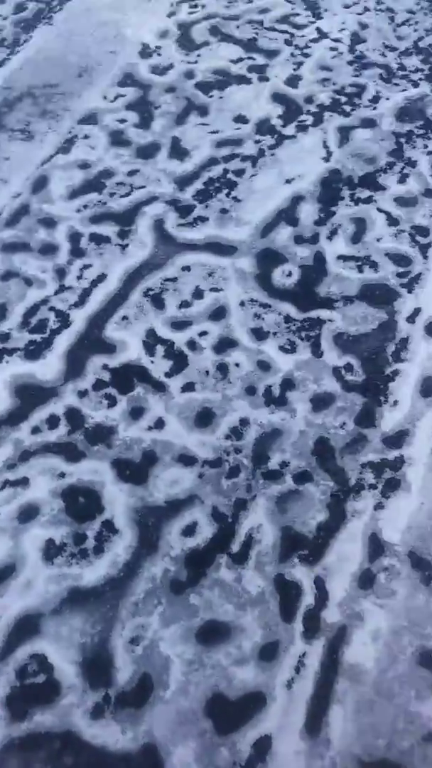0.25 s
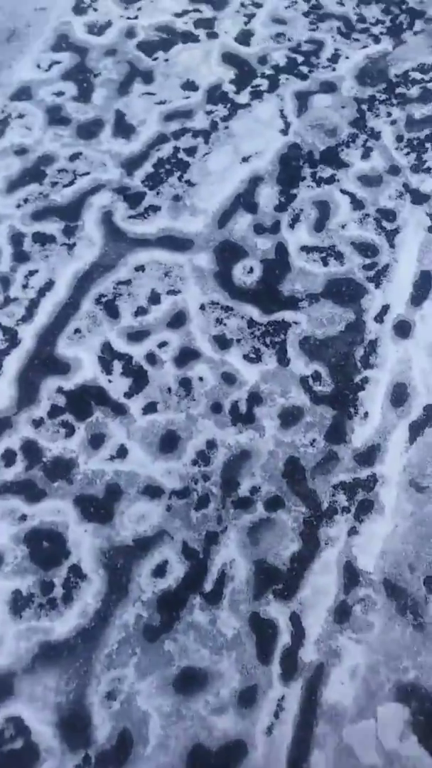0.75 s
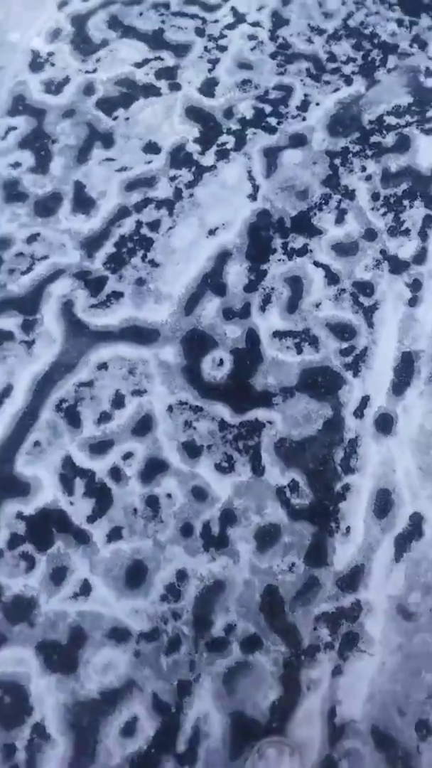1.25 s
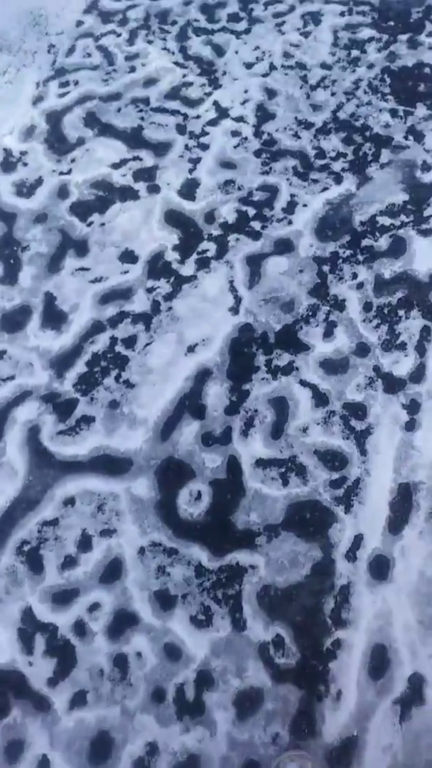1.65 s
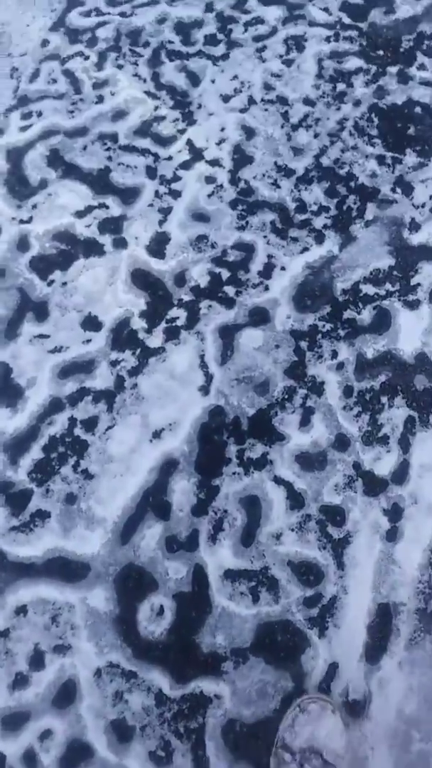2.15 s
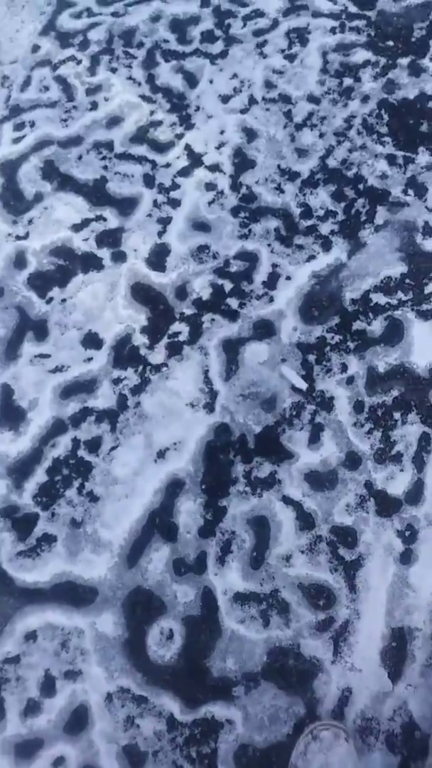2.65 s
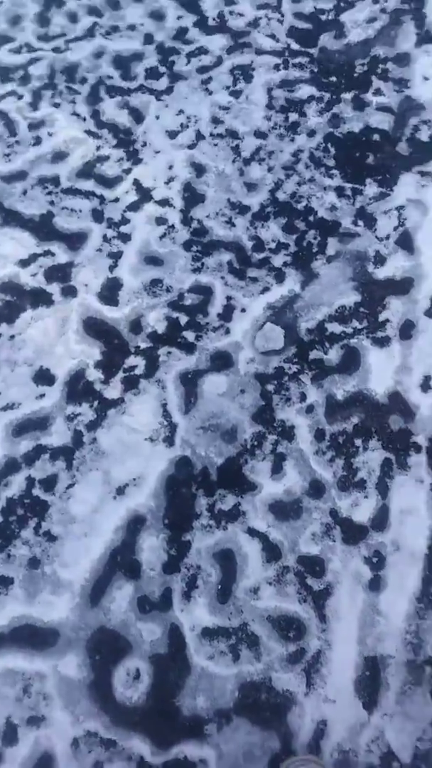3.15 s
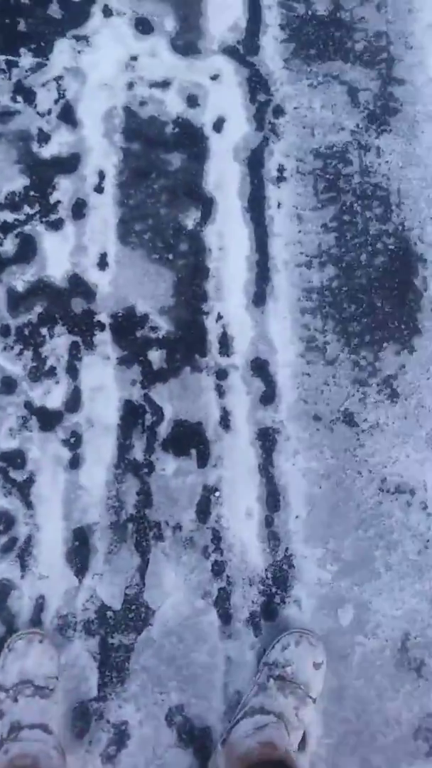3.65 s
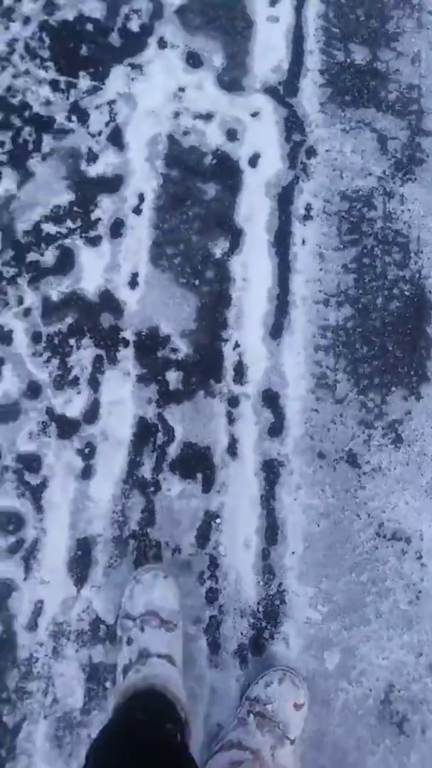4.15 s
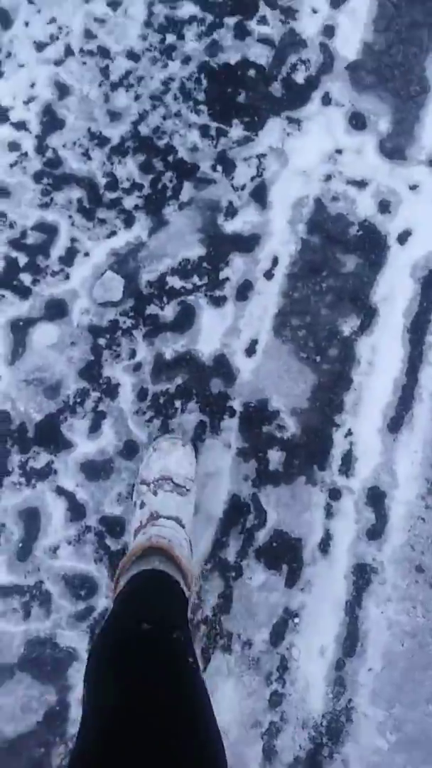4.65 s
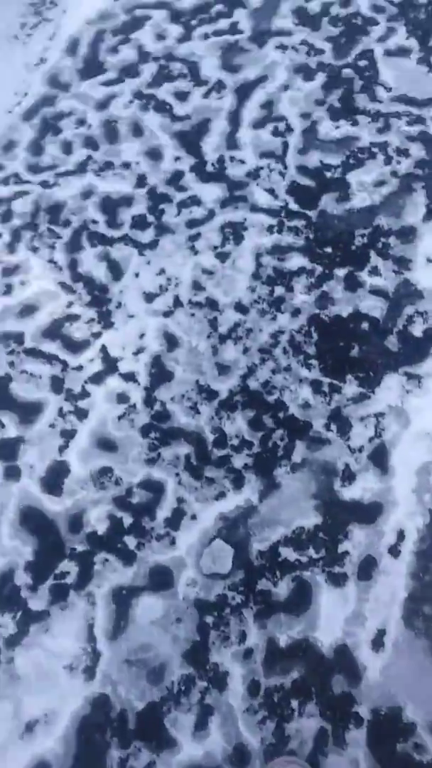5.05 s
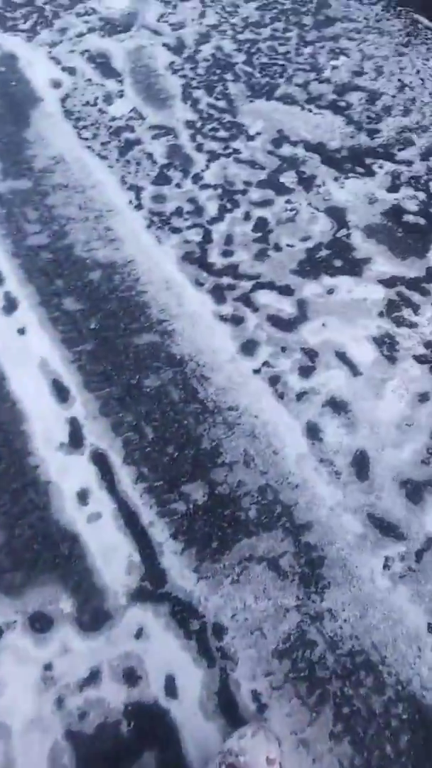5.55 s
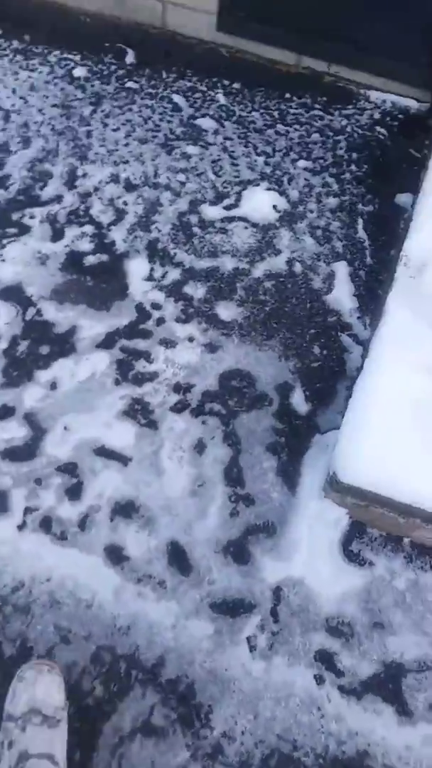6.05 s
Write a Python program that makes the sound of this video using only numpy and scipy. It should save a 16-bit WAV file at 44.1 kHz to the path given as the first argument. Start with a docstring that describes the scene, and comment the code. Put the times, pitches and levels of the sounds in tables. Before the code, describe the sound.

Close footsteps in boots on a frozen, snow-crusted driveway, with low, quiet air noise underneath. From 0 to 3 s the crunching is almost continuous: landings every 0.2 to 0.35 s, each a burst of tiny brittle fractures, with hard plate snaps, heel knocks and crackling grit. Strong cracks come at about 0.1, 0.95, 1.25, 1.65 and 2.25 s; fine icy ticks spray around 2.4 to 2.8 s, and a sharp snap lands near 2.96 s. It then thins to soft, muffled steps at 3.45 to 3.8 s. Fuller, duller crunches with low knocks and snow scrunches follow at 4.0 and 4.2 s, a small one at 4.5, another firm one at 4.76. From 5 s only faint crackles and a weak step near 5.55 s remain, until scuffing grit swells from 6.05 s to the end. A thin reflection answers from the house.

```python
"""Boots walk over crusted snow and ice on a driveway.
Each footfall crushes the crust in a burst of tiny ringing fractures; single plates snap and heels knock
as short damped tones with noisy edges. Loose grit crackles under the rolling sole, and fine crystals tick.
Packed snow dulls most later steps; the house front answers faintly, over quiet air noise."""
import sys
import numpy as np
from scipy import signal
from scipy.fft import rfft, irfft, next_fast_len
from scipy.io import wavfile

SR = 44100
rng = np.random.default_rng(int(sys.argv[2]) if len(sys.argv) > 2 else 0)


def transcribe(u):
    """Save the signal u as a 16-bit wav file named by the first command-line argument.

    u: samples, shape (n,) or (channels, n), limited to [-1, 1]; the rate is SR.
    q: integer samples, one column per channel.
    """
    v = np.clip(np.atleast_2d(u).T, -1, 1)
    q = np.round(v * 32767).astype(np.int16)
    wavfile.write(sys.argv[1], SR, q)


N = 277810

# Boot landings: (time [s], collapse length [s], packed snow [dB], crust [dB], ice crystals [dB],
# roll of the sole re the crunch [dB, before the grit trim])
LANDINGS = [(0.11, 0.0058, -26.5, -18, -18, -19), (0.329, 0.015, -28.5, -21, -24.5, -12),
            (0.578, 0.03, -29, -23, -22.5, -13), (0.941, 0.0034, -42, -20.5, -17.5, -23),
            (0.967, 0.013, -28.5, -17.5, -19.2, -15.5), (1.232, 0.02, -25, -19, -20, -15.5),
            (1.443, 0.025, -23.5, -18, -22.5, -18.5), (1.654, 0.02, -25.5, -18, -19.5, -17.5),
            (1.846, 0.047, -26, -19, -20.5, -15.5), (2.125, 0.023, -28, -19, -26.5, -12.5),
            (2.273, 0.023, -36, -18.5, -22.5, -34), (2.299, 0.039, -27.5, -19.5, -21, -38),
            (2.644, 0.032, -28.5, -20, -22.5, -39), (2.957, 0.0041, -35.5, -29, -30, -5.5),
            (2.993, 0.019, -33, -22.5, -25, -16), (3.452, 0.026, -33.5, -29, -34.5, -6.5),
            (3.586, 0.016, -47, -32, -41.5, -27), (3.725, 0.0073, -42.5, -35.5, -44, -4),
            (3.82, 0.038, -41.7, -45.5, -42.5, -14), (4.008, 0.0088, -24.5, -23.5, -26.5, -18),
            (4.205, 0.024, -23, -23.5, -32, -7.5), (4.498, 0.00283, -53, -27.5, -42, -33.5),
            (4.562, 0.0028, -37, -30.5, -41, -37), (4.759, 0.0046, -27, -19, -26, -12.5),
            (4.833, 0.0058, -36, -30, -28.5, -20.5), (4.889, 0.0025, -38, -32.5, -30.5, -39),
            (5.548, 0.016, -35, -34.5, -37, -11.5), (6.142, 0.019, -39, -49, -49.5, -14),
            (6.194, 0.022, -38, -37, -56, -12)]
# Spectrum of the finest crystals: (frequency [Hz], density [dB per Hz])
FIZZ_SPECTRUM = [(3500, -40.5), (6000, -0.5), (8000, 7), (11000, -2.5), (16000, -3.5)]


def crunches():
    """Cracks cascade while the crust collapses, then stop as the sole meets firm ground; debris settles."""
    lead_s = 0.008
    out = np.zeros(N)
    t = np.arange(SR // 8) / SR - lead_s
    for s, length_s, *levels_db, _ in LANDINGS:
        touch_db = np.where(t < 0, -13 + 2200 * t, 0)
        load = amp(touch_db - 1.5 * np.clip(1 - t / length_s, 0, 1))
        after_s = np.maximum(t - length_s, 0)
        # a longer collapse leaves more debris to settle
        debris = amp(-14 - 60 * after_s / 0.15) * np.sqrt(length_s / 0.0097)
        settling = amp(-60 * after_s / 0.0051) + debris
        cracks = fractures(len(t), rate_hz=4000, spread_db=3.5, dust=0.34)
        cracks = load * settling * jolts(len(t), rate_hz=447.6, depth_db=2.5) * cracks
        collapse = (t > 0) & (t < length_s + 0.0005)
        for db, burst in zip(levels_db, materials(bounced(cracks, share=0.37), cushion_at(s))):
            collapse_rms = np.sqrt(np.mean(burst[collapse] ** 2))
            add(out, s - lead_s, burst * amp(db) / collapse_rms)
    return out


def fractures(size, rate_hz, spread_db, dust):
    """Micro-cracks of widely varying strength, each ringing its own chip for a few cycles, plus white dust."""
    count = int(rate_hz * size / SR) + 1
    when, pitch, life, strength, turn = rng.random((count, 5)).T[:, :, None]
    t = np.arange(SR // 300) / SR
    hz = 350 + 11000 * pitch ** 2
    cycles = 3.0 + 7 * life  # to -60 dB
    # small chips ring so briefly that they need taller peaks to carry their share
    peak = amp(spread_db * np.minimum(-np.log(1 - strength), 3.5))
    peak = peak * np.minimum(hz, 4000) ** 0.83 / np.sqrt(cycles)
    chips = peak * np.cos(2 * np.pi * (hz * t + turn)) * amp(-60 * hz * t / cycles)
    places = (when * size).astype(int) + np.arange(len(t))
    cracks = np.bincount(places.ravel(), chips.ravel(), size)[:size]
    return unit(cracks) + dust * rng.standard_normal(size)


def jolts(size, rate_hz, depth_db):
    """Gain that jerks up and down as the load breaks through one layer after another."""
    knots = rng.standard_normal(int(size * rate_hz / SR) + 2).clip(-2, 2)
    return amp(depth_db * np.interp(np.arange(size) * rate_hz / SR, np.arange(len(knots)), knots))


def materials(cracks, cushion):
    """The same cracks as heard in packed snow, crust and ice crystals; cushioning dulls the last two."""
    # Spectra of packed snow, bare crust, snow-covered crust, crystals: (frequency [Hz], density [dB per Hz])
    snow_spectrum = [(60, -28.5), (160, -25), (270, -3.5), (400, -1), (540, 1), (710, 3), (900, -4),
                     (1500, -40.5), (4000, -92)]
    bare_spectrum = [(300, -42.5), (700, -20), (1000, -9), (1400, 1.5), (1750, -2.5), (2100, -1),
                     (2650, -6), (3400, -21), (7000, -60.5)]
    covered_spectrum = [(300, -47), (700, -19), (930, -2.5), (1180, 3.5), (1500, -3), (2050, -17.5),
                        (2650, -21), (3400, -37.5), (7000, -41)]
    crystal_spectrum = [(1000, -47), (2200, -15.5), (3000, 5), (3900, 4.5), (5000, 2), (7000, -2.5),
                        (16000, -28)]
    share = np.clip(cushion, 0, 1)
    bare = unit(coloured(cracks, bare_spectrum))
    covered = unit(coloured(cracks, covered_spectrum))
    crust = (1 - share) * bare + share * covered
    fizz = amp(-11.5 - 2.6 * share) * unit(coloured(cracks, FIZZ_SPECTRUM))
    crystals = unit(coloured(cracks, crystal_spectrum)) + fizz
    return unit(coloured(cracks, snow_spectrum)), crust, crystals


def bounced(x, share):
    """Reflections off boot and ice a few hands away give each step its own hollow colour."""
    out = x.copy()
    for delay_s, sign in zip(rng.uniform(0.0004, 0.0025, 3), rng.choice([-1, 1], 3)):
        add(out, delay_s, sign * share * x)
    return out


def cushion_at(s):
    """Share of snow cover under the boot, cushioning the ice."""
    # (time [s], share [0-1])
    cover_points = [(0, 0.17), (3.1, 0.12), (3.45, 0.55), (3.7, 0.79), (4.6, 0.48), (4.8, 0.63),
                    (5.05, 0.2), (5.4, 0.05), (5.6, 0.57), (6.3, 0.58)]
    return np.clip(np.interp(s, *np.transpose(cover_points)), 0, 1)


def snaps(plates):
    """A plate breaks in a quick stutter and rings for a few cycles; lower plates ring longer."""
    # Spectrum of the sharp edge: (frequency [Hz], density [dB per Hz])
    edge_spectrum = [(300, -22), (1200, -15), (3000, 7), (5000, 0), (8000, -5.5), (16000, -13)]
    out = np.zeros(N)
    t = np.arange(SR // 25) / SR

    def sized(x):
        """Energy of 8 ms at rms 1."""
        return unit(x) * np.sqrt(0.008 / t[-1])

    for s, db, hz, edge_db in plates:
        cracks = fractures(len(t), rate_hz=4000, spread_db=3.5, dust=0.56)
        stutter = amp(-60 * t / 0.014) * cracks
        blow = 0.76 * stutter / np.linalg.norm(stutter)
        blow[0] += 1
        t60_s = 0.00088 + 5 / hz
        ring = np.sin(2 * np.pi * hz * t) * amp(-60 * t / t60_s) * (1 - np.exp(-t * hz / 0.95))
        plate = signal.fftconvolve(blow, np.diff(ring, prepend=0))[:len(t)]
        edge = coloured(amp(-60 * t / 0.015) * cracks, edge_spectrum)
        add(out, s, amp(db) * (sized(plate) + amp(edge_db - 1.0) * sized(edge)))
    return out


def stray_snaps(on_crust, on_crystals):
    """Small plates break at jittered times, as hard as the crust is loaded; snow softens and lowers them."""
    count = int(14 * N / SR)  # 14 a second
    place, size = rng.uniform(-0.89, 1, (count, 2)).T
    at = ((np.arange(count) + (place + 1) / 2) / count * (N - 1)).astype(int)
    cover = cushion_at(at / SR)
    db = 20 * np.log10(on_crust[at]) + 3.5 - 9 * cover
    hz = 1890 * 2 ** (0.34 * size - 0.62 * cover)  # exponents in octaves
    # more load on crystals than on crust sharpens the edge
    edge_db = -9 + 20 * np.log10(on_crystals[at] / on_crust[at])
    return list(zip(at / SR, db, hz, edge_db))


def pushes():
    """Packed snow yields with a short, low scrunch as weight shifts onto it."""
    # (mid time [s], length [s], level before the swell [dB])
    shifts = [(3.222, 0.072, -51.5), (4.191, 0.08, -29), (4.214, 0.053, -37), (4.707, .03, -33),
              (5.119, 0.07, -52), (5.188, 0.078, -50), (5.289, 0.072, -48.5)]
    # (frequency [Hz], density [dB per Hz])
    push_spectrum = [(80, -41), (180, -8.5), (290, 2), (400, -4), (600, -17), (1200, -38), (3000, -69)]
    out = np.zeros(N)
    t = np.arange(SR // 8) / SR
    for s, length_s, db in shifts:
        weight = np.sin(np.pi * np.minimum(t / length_s, 1))
        cracks = fractures(len(t), rate_hz=1500, spread_db=5.5, dust=0.34)
        add(out, s - length_s / 2, amp(db) * weight * unit(coloured(cracks, push_spectrum)))
    return out


def sole_load():
    """How hard soles work snow, crust and crystals: shuffle, roll after landing, scuffs, hush on lifting."""
    # Grit shifting under the standing foot, before the grit trim:
    # (time [s], packed snow [dB], crust [dB], ice crystals [dB])
    shuffle = [(0, -59.5, -49.5, -55.5), (0.3, -60, -52, -47.5), (0.5, -60, -44, -47),
               (1.1, -53, -42.5, -45.5), (1.8, -53.5, -43, -50), (2.5, -59, -47.5, -45),
               (3.08, -58, -41, -66), (3.2, -76, -60, -49.5), (3.4, -63, -56, -49.5),
               (3.66, -69, -52.5, -67), (3.88, -66, -53, -80), (4.66, -58, -59.5, -72),
               (4.98, -61.5, -49, -65), (5.2, -79, -49.5, -53.5), (5.42, -61.5, -53.5, -52),
               (5.8, -64, -55, -78), (6.05, -49, -42.5, -103), (6.3, -42.5, -32.5, -51)]
    # Sole drags, swelling and fading, before the grit trim:
    # (start [s], length [s], packed snow [dB], crust [dB], ice crystals [dB])
    scuffs = [(0.026, 0.065, -72, -47, -46), (0.478, 0.092, -47, -51, -43), (0.945, 0.04, -28.5, -26, -33),
              (2.168, .07, -58, -40.5, -37.5), (2.504, 0.068, -44.5, -36, -42),
              (2.618, 0.038, -46, -31, -27.5), (2.71, 0.13, -52, -40.5, -44.5),
              (2.866, 0.17, -41, -35.5, -36.5), (3.369, 0.19, -38, -41.5, -62),
              (3.982, 0.04, -24.5, -33.5, -40), (4.012, 0.044, -67, -30.5, -44),
              (4.173, 0.067, -31, -36, -50), (4.34, 0.17, -42.5, -49, -51), (4.714, 0.081, -31, -27, -32.5),
              (5.658, 0.081, -47, -46, -73), (5.987, 0.035, -41, -43, -87), (6.081, 0.037, -45, -34, -80),
              (6.135, 0.12, -42.5, -47, -52.5)]
    # Weight comes off the grit between steps: mid time [s]
    lifts = [0.088, 0.3, 1.189, 1.365, 1.63, 1.81, 3.955, 4.155, 4.66, 4.815]
    # Depth of that hush in packed snow, crust, ice crystals [dB]
    hush_db = [-2.5, -6, -5]
    hush_s = 0.12
    t = np.arange(N) / SR

    knots_s, *levels_db = np.transpose(shuffle)
    standing = amp([np.interp(t, knots_s, db) for db in levels_db])
    # the shuffling catches and slips
    power = (standing * jolts(N, rate_hz=20, depth_db=1)) ** 2

    # the roll dies away at 119.5 dB/s as the weight settles
    fade = amp(-119.5 * t[:SR // 2]) ** 2
    for s, length_s, *levels_db, roll_db in LANDINGS:
        for material, db in zip(power, levels_db):
            add(material, s + length_s, amp(db + roll_db) ** 2 * fade)

    for s, length_s, *levels_db in scuffs:
        power += np.outer(amp(levels_db) ** 2, swell(s, length_s) ** 2)

    lifted = sum(swell(s - hush_s / 2, hush_s) ** 2 for s in lifts)
    return np.sqrt(power) * amp(np.outer(hush_db, lifted))


def swell(s, length_s):
    """Gain of a stroke that rises and falls once, as a half sine."""
    return np.sin(np.pi * np.clip((np.arange(N) / SR - s) / length_s, 0, 1))


def grinding(load):
    """Loose grit crackles as the sole rolls and scrapes: a dense bed with sparse, stronger grains."""
    bed = fractures(N, rate_hz=3500, spread_db=0.0, dust=0.24) * jolts(N, rate_hz=130, depth_db=3.5)
    grains = fractures(N, rate_hz=420, spread_db=5.5, dust=0)
    layers = materials(unit(bed) + 0.56 * grains, cushion_at(np.arange(N) / SR))
    return amp(1.6) * np.sum(load * layers, axis=0)  # grit trim


def splinters(on_crystals):
    """The finest crystals break in high, brittle, clustered ticks, underfoot and in sprays off the toe."""
    # Toe flicks up crystals: (start [s], length [s], level at the peak of the swell [dB])
    sprays = [(0.52, 0.16, -43), (1.12, 0.05, -41.5), (1.94, 0.075, -54), (2.369, 0.23, -40.5),
              (2.805, .03, -27), (3.41, .17, -49.5), (4.96, 0.18, -54.5), (5.33, .3, -58.5),
              (5.54, 0.045, -55)]
    ticks = fractures(N, rate_hz=1100, spread_db=5, dust=0.3) * jolts(N, rate_hz=93, depth_db=6.5)
    # 11.5 dB under the crystal load, 8.5 dB less again on full snow cover
    underfoot = on_crystals * amp(-11.5 - 8.5 * cushion_at(np.arange(N) / SR))
    flicked = sum(amp(db) * swell(s, length_s) for s, length_s, db in sprays)
    return np.hypot(underfoot, flicked) * unit(coloured(ticks, FIZZ_SPECTRUM))


def snow_tinted(x):
    """Snow cover reshapes the treble: a lift near 8 kHz, a slight cut below 5 and above 15 kHz."""
    share = cushion_at(np.arange(N) / SR)
    tinted = coloured(x, [(5000, -2), (8000, 6.0), (11000, 1), (15000, -2)])
    return (1 - share) * x + share * tinted


def yard(x):
    """A thin, late answer from the house front: decaying noise whose lows and top outlast the middle."""
    # (frequency [Hz], t60 [s])
    decay = [(200, 0.4), (1500, 0.17), (5000, 0.13), (12000, 0.48)]
    hz, t, bins = signal.stft(rng.standard_normal(SR // 2), SR, nperseg=256)
    bins = bins * amp(-60 * t / along(decay, hz)[:, None])
    tail = signal.istft(bins, SR, nperseg=256)[1]
    tail = coloured(tail, [(200, -4.0), (1300, 5.5), (3000, -8), (10000, -2.5)])
    out = np.zeros(N)
    add(out, 0.014, signal.fftconvolve(x, tail / np.linalg.norm(tail)))
    return out


def still_air():
    """Steady noise of the winter air, strongest in the lows and falling towards the treble."""
    # (frequency [Hz], density [dB per Hz])
    air_spectrum = [(30, -8), (120, -6), (250, 0), (900, -5), (2500, -14), (6000, -26), (16000, -40)]
    return amp(-68) * unit(coloured(rng.standard_normal(N), air_spectrum))


def amp(db):
    """Decibels to gain."""
    return 10 ** (np.asarray(db) / 20)


def unit(x):
    """Scale to rms 1."""
    return x / np.sqrt(np.mean(x ** 2) + 1e-20)


def along(points, hz):
    """(Hz, value) points read on a log frequency axis."""
    f, v = np.transpose(points)
    return np.interp(np.log(hz + 1), np.log(f + 1), v)


def coloured(x, points):
    """Minimum-phase filter with the given (Hz, dB) spectrum, so that attacks stay sharp."""
    size = 4096
    cepstrum = irfft(np.log(amp(along(points, np.fft.rfftfreq(size, 1 / SR)))))
    # fold onto positive time: causal
    cepstrum[1:size // 2] *= 2
    cepstrum[size // 2 + 1:] = 0
    return signal.oaconvolve(x, irfft(np.exp(rfft(cepstrum))))[:len(x)]


def add(track, s, sound):
    """Mix a sound in at time s, cut at the track's end."""
    start = max(round(s * SR), 0)
    part = track[start:start + len(sound)]
    part += sound[:len(part)]


def scene():
    """Boots and grit, the echo of the boots, and the still winter air."""
    # Plates snap and heels knock: (time [s], level before the snap trim [dB], pitch [Hz],
    # sharp edge re plate before a 1 dB cut [dB])
    placed_snaps = [(0.0691, -31.5, 2200, -2.5), (0.1108, -11.5, 1484, -23), (0.3424, -30, 1530, -23),
                    (0.3622, -27, 1920, -22), (0.5454, -28.5, 4500, -4), (0.6644, -27.5, 3130, -3),
                    (0.6977, -29.5, 1841, -16), (0.707, -29.5, 1240, -13), (0.756, -23, 1980, -25),
                    (0.7698, -30, 2874, -21), (0.7814, -19.5, 1970, -20), (0.7969, -17.5, 1780, -10),
                    (0.8989, -31.5, 1540, -4), (1.0064, -24.5, 2020, 1), (1.1029, -36, 2400, 6),
                    (1.2495, -16.5, 730, -26), (1.3097, -26.5, 2460, 2.5), (1.3912, -26.5, 2040, -6.5),
                    (1.4473, -22.5, 1580, -11.5), (1.5937, -26, 1670, -4), (1.6764, -17, 1430, -19.5),
                    (1.6992, -26, 1170, -3), (1.839, -25.5, 1840, -4.5), (1.9594, -34.5, 2378, 7.5),
                    (2.006, -31, 1680, -4.5), (2.0826, -28, 1740, -6), (2.1654, -23.5, 1470, -2.5),
                    (2.1837, -25.5, 1450, -3), (2.2015, -26, 3180, -13.5), (2.2225, -28, 3580, -5),
                    (2.2362, -13.5, 1290, -15), (2.275, -17.5, 2920, -16), (2.4361, -33.5, 4800, -7.5),
                    (2.4402, -34, 4830, -11), (2.4805, -29.5, 5630, -4.5), (2.4974, -24, 5500, -18),
                    (2.5025, -25, 5100, -18), (2.5259, -32, 1610, -10), (2.6085, -29.5, 5170, 0.5),
                    (2.675, -23.5, 1460, -13), (2.758, -31, 1900, 0.5), (2.8128, -37, 2980, 8),
                    (2.8219, -33, 3060, 9), (2.8832, -22, 1330, -4.5), (2.9213, -24.5, 1380, -6),
                    (2.961, -14, 1330, -10.5), (3.1094, -35, 2040, -13), (3.4341, -35, 1279, -10),
                    (3.5236, -29.5, 1220, -21), (3.7506, -32.5, 1000, -23), (3.8494, -31, 1148, -9),
                    (4.0095, -15, 683, -38), (4.1636, -27, 380, -47), (4.1696, -33, 368, -37),
                    (4.1765, -24.5, 490, -39), (4.2466, -17.5, 890, -20), (4.3261, -24, 1040, -26),
                    (4.4434, -33, 4340, -25), (4.4804, -32, 1340, -20), (4.4995, -27, 372, -11.5),
                    (4.6962, -25.5, 530, -31), (4.7057, -30, 1370, -28), (4.762, -16.5, 1150, -17.5),
                    (5.0265, -35, 1840, -12), (5.0661, -23, 1600, -20), (5.123, -38, 1960, -6),
                    (5.1888, -36.5, 1520, -13), (5.217, -44, 1900, -13), (5.256, -41, 1790, -19),
                    (5.2629, -47, 2980, 11.5), (5.2913, -39, 2600, -11.5), (5.3671, -44.5, 2430, -10),
                    (6.0926, -37, 1190, -27.5), (6.202, -31.5, 1000, -19), (6.2134, -25.5, 1140, -21),
                    (6.2473, -28, 1200, -31)]
    load = sole_load()
    _, on_crust, on_crystals = load
    landings = crunches() + pushes()
    grit = snow_tinted(grinding(load) + splinters(on_crystals))
    plates = amp(-0.5) * snaps(placed_snaps + stray_snaps(on_crust, on_crystals))  # snap trim
    boots = snow_tinted(landings + plates)
    return (boots + amp(-18) * yard(boots) + grit + still_air())[None]


def record(dry):
    """A small microphone with little bass or top; the loudest cracks flatten against its ceiling."""
    # Microphone colour, with two notches from its port: (frequency [Hz], gain [dB])
    mic_response = [(20, -48), (110, -13), (165, -0.5), (240, -1.5), (5200, -1.5), (6100, -8),
                    (6850, -12.5), (7100, -21), (7400, -10.5), (9000, -12), (9500, -21.5), (9900, -12.5),
                    (16000, -12.5)]
    x = coloured(dry[0], mic_response)
    ceiling, hardness = 0.54, 8
    x = x / (1 + np.abs(x / ceiling) ** hardness) ** (1 / hardness)
    top_hz = 16200
    size = next_fast_len(N)
    passed = np.fft.rfftfreq(size, 1 / SR) < top_hz
    return irfft(rfft(x, size) * passed, size)[None, :N]


dry = scene()
out = record(dry)
transcribe(out)
```